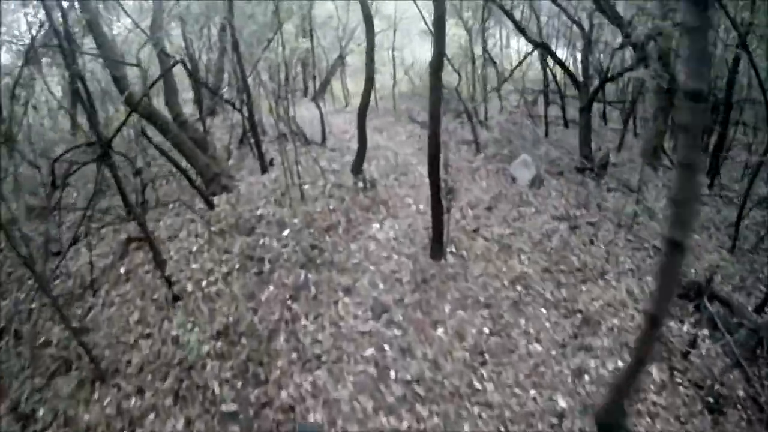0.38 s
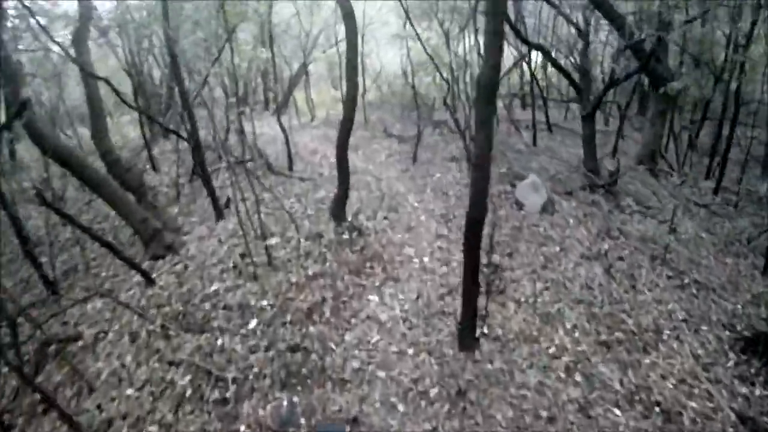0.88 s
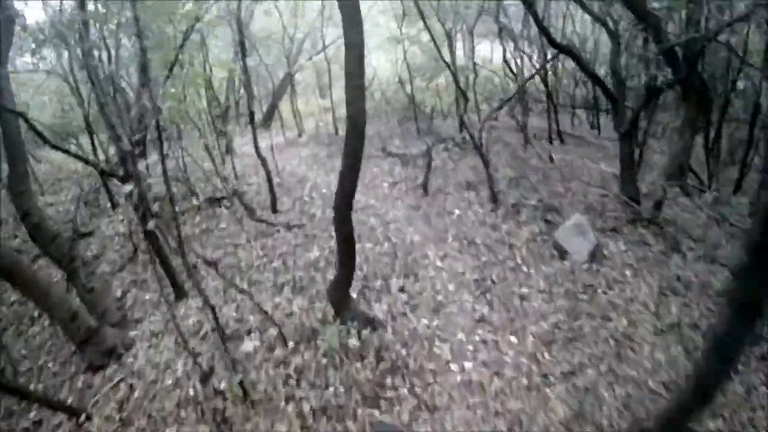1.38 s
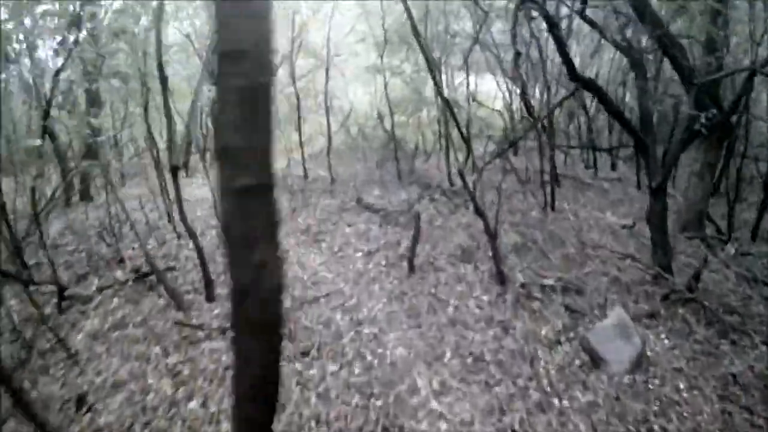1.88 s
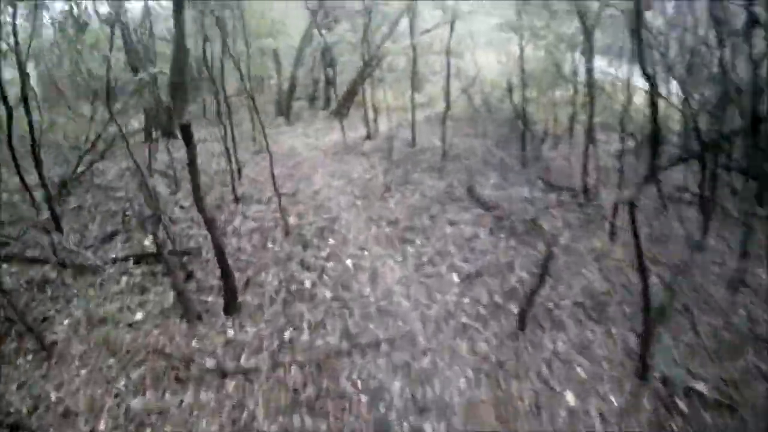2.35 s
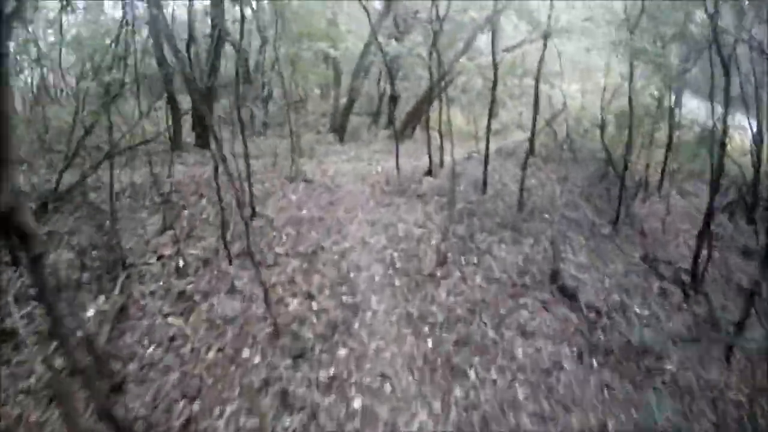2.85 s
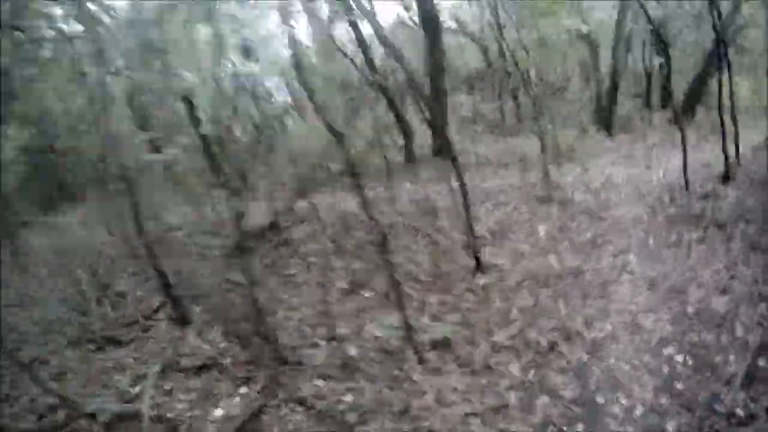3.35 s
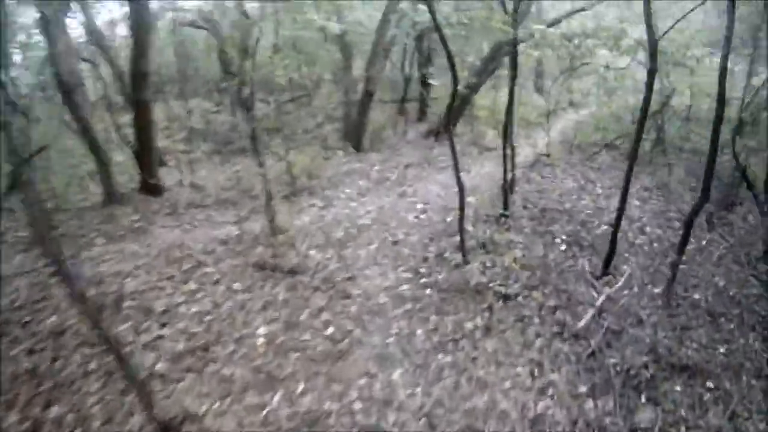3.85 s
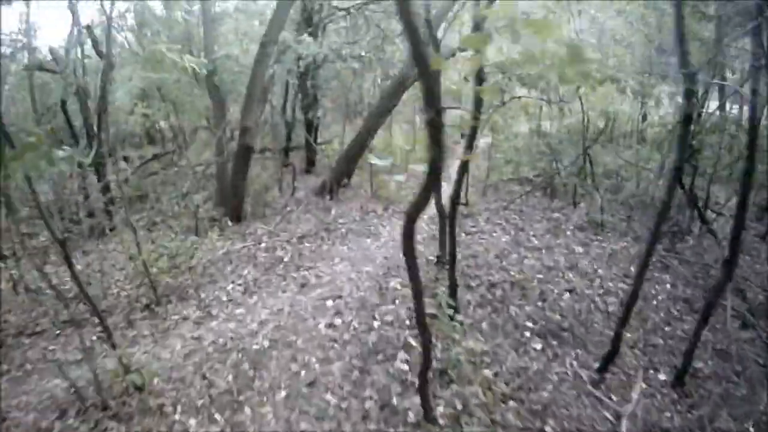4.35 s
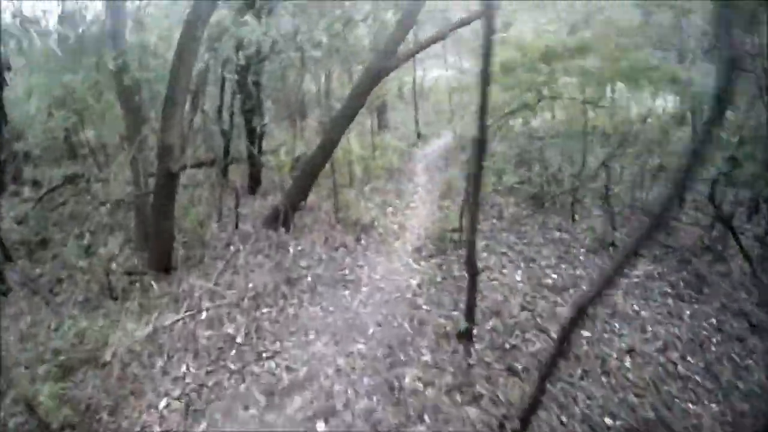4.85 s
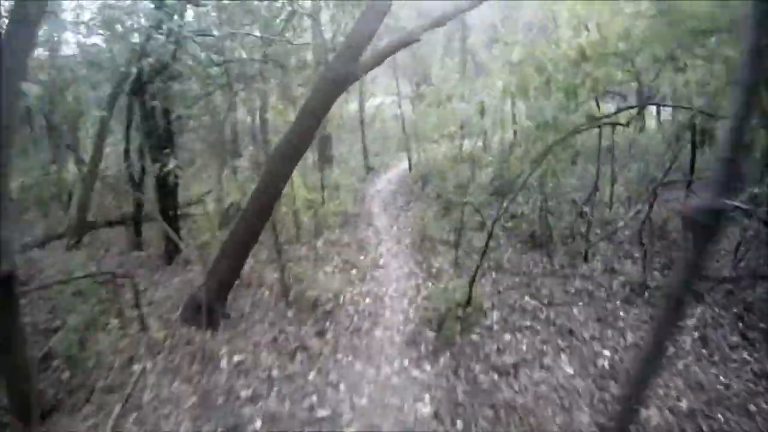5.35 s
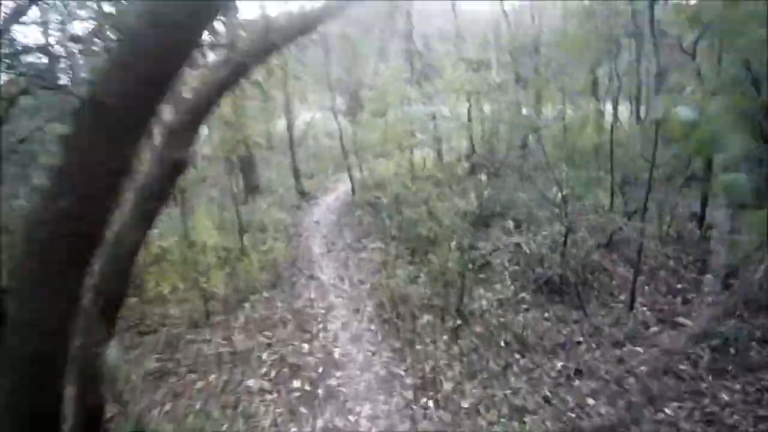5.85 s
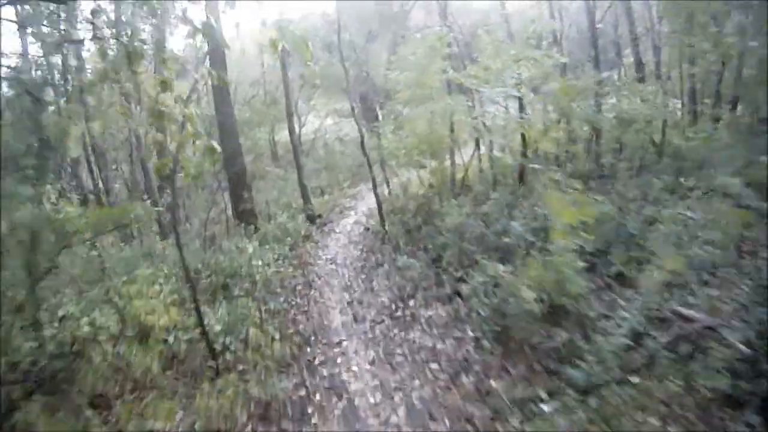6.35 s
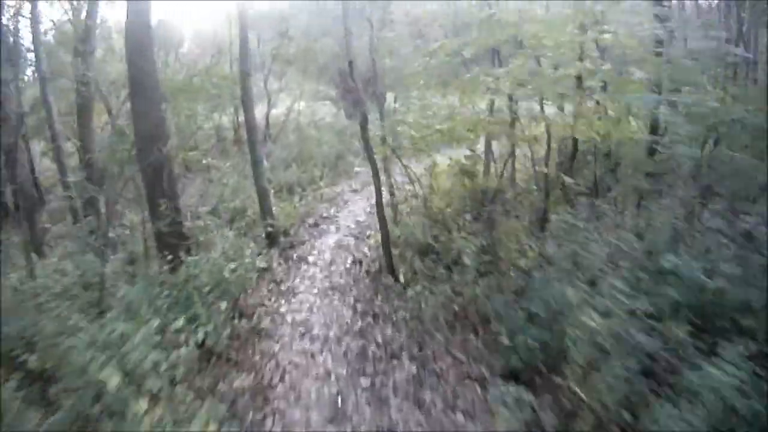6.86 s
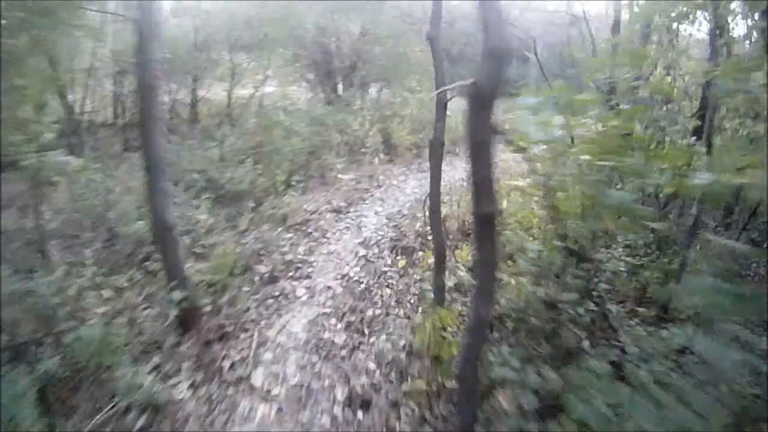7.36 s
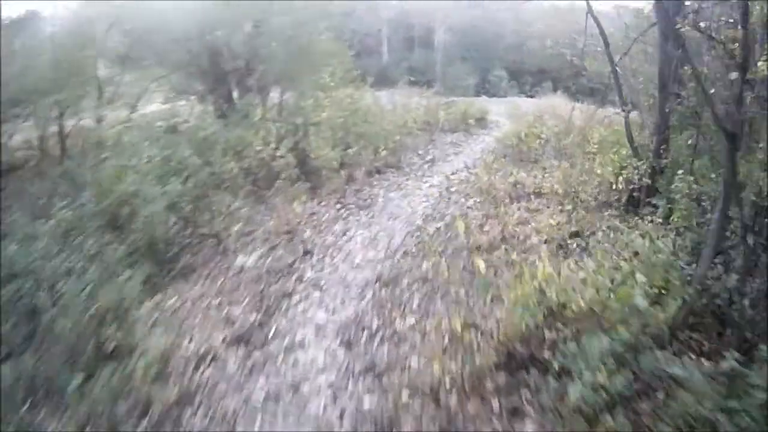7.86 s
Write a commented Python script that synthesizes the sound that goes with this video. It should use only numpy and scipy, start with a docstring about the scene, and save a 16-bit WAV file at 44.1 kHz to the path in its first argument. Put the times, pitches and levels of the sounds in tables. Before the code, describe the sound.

A mountain bike rolls over crackling dry leaves, with low mount thumps, hard plastic knocks, bright rattles and a fast electrical ticking underneath.

```python
"""Jolts, knocks, rattles and squeaks over hissing, crackling leaves, with a fast electric ticking below.
A small camera in a sealed plastic case rides on a cyclist's helmet along a leafy forest trail.
Bumps swing the mount, knocks and loose parts ring the case, and noise filtered by tyres and case makes the leaves.
The camera's supply ticks with its frame rate; its 12 kHz samples are held, which mirrors the sound upward."""
import sys
import numpy as np
from scipy import signal
from scipy.fft import rfft, irfft
from scipy.io import wavfile
from scipy.ndimage import uniform_filter1d

SR = 44100
rng = np.random.default_rng(int(sys.argv[2]) if len(sys.argv) > 2 else 0)


def amplitude_ratio(level_db):
    """Convert a level in decibels to the matching linear amplitude (field) ratio."""
    exponent = np.asarray(level_db, float) / 20
    return 10 ** exponent


def wav_out(sig):
    """Save sig, one row per channel (or a flat mono array), as 16-bit PCM at SR to the path in sys.argv[1]."""
    wavfile.write(sys.argv[1], SR, np.round(np.clip(np.atleast_2d(sig).T, -1, 1) * 32767).astype(np.int16))


N = 362502
T = np.arange(N) / SR
STOP_S = 7.9722  # the sound stops here, shortly before the end

# air and walls of the case under bright clicks: f/Hz, width/Hz, level/dB
CASE_BRIGHT = [(2655, 250, -1), (3145, 120, 1), (3480, 240, -2.5), (3944, 140, -3), (4150, 610, -9),
               (4865, 173, -2), (5280, 360, -9)]
# leaves under the tyres, as the levels they give: t/s, crackle/dB, tyre hiss/dB
LEAF_LEVELS = [(0, -72, -62.5), (.15, -62.5, -60.5), (.4, -63.5, -60), (.55, -69, -60.5), (.8, -61, -58.5),
               (1.25, -62, -59), (1.62, -59, -56.5), (1.75, -63, -61), (1.98, -68, -62), (2.1, -63, -60),
               (2.35, -62, -60), (2.5, -65.5, -63.5), (2.7, -59.5, -58), (3.0, -60.5, -60.5),
               (3.5, -56.5, -59), (3.58, -70.5, -64), (3.85, -68, -64), (4.0, -60, -57), (4.2, -61, -61.5),
               (4.5, -67, -62.5), (4.7, -63.5, -61.5), (5.15, -61.5, -58.5), (5.5, -62.5, -59.5),
               (5.75, -67, -61.5), (6.05, -64, -63), (6.3, -68.5, -61.5), (6.45, -58.5, -59.5),
               (6.9, -68.5, -59.5), (7.08, -63, -58.5), (7.4, -67.5, -57), (7.8, -62, -58)]


def level(x, db):
    """Scale to an rms level."""
    return x * amplitude_ratio(db) / np.sqrt(np.mean(x ** 2))


def colour(x, points):
    """Shape the spectrum along (f/Hz, level/dB) points."""
    hz, db = np.transpose(points)
    bins = np.fft.rfftfreq(N, 1 / SR) + 1e-3  # avoids the logarithm of zero
    gain_db = np.interp(np.log(bins), np.log(hz), db)
    return irfft(rfft(x) * amplitude_ratio(gain_db), N)


def resonate(x, peaks):
    """Sum of band-pass resonances with alternating sign."""
    total = 0
    for k, (hz, width, db) in enumerate(peaks):
        b, a = signal.iirpeak(hz, hz / width, SR)
        total = total + (-1) ** k * amplitude_ratio(db) * signal.lfilter(b, a, x)
    return total


def bright(x, peaks, low_hz=2550):
    """Bright resonances of the case; such sounds are weakened more and more below low_hz."""
    high_pass = signal.butter(3, low_hz, "high", fs=SR, output="sos")
    return signal.sosfilt(high_pass, resonate(x, peaks))


def walk(rate):
    """Random levels held 1 / rate s and smoothed twice; spread 1."""
    k = int(SR / rate)
    held = np.repeat(rng.standard_normal(N // k + 1), k)
    w = uniform_filter1d(uniform_filter1d(held, k), k)[:N]
    return w / w.std()


def grains(per_s, spread_db):
    """Scattered clicks of either sign, a few larger than the rest."""
    hit = rng.random(N) < per_s / SR
    extra_db = spread_db * np.minimum(rng.exponential(size=N), 3)
    return hit * rng.standard_normal(N) * amplitude_ratio(extra_db)


def gritty(per_s, spread_db, share_db):
    """Smooth noise with a share of separate grains."""
    smooth = level(rng.standard_normal(N), 0)
    return smooth + level(grains(per_s, spread_db), share_db)


def add(out, s, x):
    """Mix x in at time s."""
    i = int(s * SR)
    out[i:i + len(x)] += x[:N - i]


def jolts(rise=0.27, fall=0.57):
    """The mount swings out once and rings down; rise and fall are in swing periods."""
    # jolts of the mount, at the crest of the swing: t/s, peak level/dB, swing f/Hz
    bumps = [(0.115, -36, 26), (0.55, -42, 30), (0.892, -37, 35), (1.7355, -31.5, 31), (2.013, -33, 37.7),
             (2.2575, -32.5, 26.3), (2.328, -34.5, 30), (2.629, -38, 28), (3.0638, -26.5, 35),
             (3.349, -33.5, 31), (3.417, -20.5, 44.6), (3.4805, -17, 45.4), (4.136, -36, 29.5),
             (4.895, -42.5, 25), (5.0295, -36, 40), (5.0864, -35, 36.8), (5.193, -31, 30.3),
             (5.546, -36.5, 38), (6.141, -36, 31.2), (6.399, -30, 34), (6.456, -19.5, 58),
             (6.521, -12.5, 50), (6.7642, -41, 33.6), (6.8866, -35.5, 70), (6.925, -40, 39),
             (7.002, -35.5, 28), (7.087, -24, 39), (7.181, -21.5, 55.3), (7.225, -25.5, 38),
             (7.4018, -29.5, 33), (7.4447, -27.5, 28.6), (7.6606, -33.5, 28.8), (7.733, -36.5, 65),
             (7.7644, -32, 60), (7.8705, -36, 37.4), (7.9465, -33.5, 36)]
    out = np.zeros(N)
    t = np.arange(-.06 * SR, .16 * SR) / SR
    for s, db, hz in bumps:
        swing = t * hz
        # rounded at the crest, a quick swell before it and a straight decay (in dB) after
        shape = np.where(t < 0, np.exp(-(swing / rise) ** 2), 1 / np.cosh(swing / fall))
        add(out, s + t[0], amplitude_ratio(db) * shape * np.cos(2 * np.pi * swing))
    return out


def knocks(knee_hz=680, thud_db=-14, thud_per_tilt=1.7, thud_s=0.0033):
    """A push, then scraping, rings the walls; spots favour low or high modes, dull knocks shove the whole case."""
    # walls of the case when knocked: f/Hz, level/dB, time to fall by 60 dB/s
    case_modes = [(494, -18.5, 0.0081), (627, -5.5, 0.021), (713, -3.5, 0.023), (990, -7.5, 0.015),
                  (1250, 3, 0.0054), (1694, 6, 0.0063), (2090, -1, 0.016), (2633, -17, 0.045)]
    # knocks on the case: t/s, peak level of the blow/dB, brightness/(dB per octave),
    # scraping level against the blow/dB, scraping time (strongest halfway)/s
    hits = [(3.032, -38, -12.5, -1.5, 0.0027), (3.036, -36.5, -7.5, 3, 0.0062),
            (3.042, -38.5, -3.5, 6.5, .0055), (3.303, -45.5, 5, 2.5, 0.016), (3.318, -46, 1, 4, .01),
            (3.372, -44, -2, 1, .008), (3.392, -46, 17, 6, 0.013), (3.407, -41, -4, 6.5, .006),
            (3.425, -49, 4, 4.5, .008), (3.439, -39, -8, 3.5, 0.0046), (3.449, -45, -1.5, 9, 0.0084),
            (4.914, -49.5, 10, 10, 0.027), (5.864, -50.5, 28.5, 6.5, 0.0061),
            (6.4442, -5.5, 1, -14.5, .006), (6.4789, -22.5, -6, -5, 0.013), (6.497, -40, 1, 3, 0.0071),
            (6.51, -39, -5, 4, 0.0098), (6.8, -37, 32, -2, .006), (7.056, -40, -7, 5.5, 0.0044),
            (7.1674, -30, -6, -2.5, .006), (7.205, -42, -11, -12, 0.0037), (7.341, -44.5, -5, -2.5, .006),
            (7.3727, -32.5, -8.5, 0.5, 0.0081), (7.581, -45.5, 2, 5, 0.0091)]
    # a harder, brighter knock touches more briefly: time at even brightness, dB per octave that halve it
    even_contact_ms, halving_db = 0.38, 13.5
    out = np.zeros(N)
    t = np.arange(int(.1 * SR)) / SR
    grits = rng.standard_normal((len(hits), len(t)))
    for (s, db, tilt_db, scrape_db, scrape_s), grit in zip(hits, grits):
        ring = np.zeros(len(t))
        for hz, mode_db, t60 in case_modes:
            mode_amp = amplitude_ratio(mode_db + tilt_db * np.log2(max(hz, knee_hz) / 1000))
            ring += mode_amp * np.exp(-np.log(1000) * t / t60) * np.sin(2 * np.pi * hz * t)
        contact_ms = even_contact_ms * 2 ** (-tilt_db / halving_db)
        # the wall is pushed in and springs back, each for the contact time
        push = np.sin(2 * np.pi * np.clip(500 * t / contact_ms, 0, 1))
        blow = signal.fftconvolve(push, ring)[:len(t)]
        thud = amplitude_ratio(thud_db - thud_per_tilt * tilt_db) * t / thud_s * np.exp(1 - t / thud_s)
        # the scraping swells and dies
        age = 2 * t / max(scrape_s, .001)
        scrape = signal.fftconvolve(grit * age * np.exp(-age ** 2 / 2), ring)[:len(t)]
        ringing = blow / np.abs(blow).max() + amplitude_ratio(scrape_db) * scrape / np.abs(scrape).max()
        add(out, s, amplitude_ratio(db) * (ringing - thud))
    return out


def rattles(bounce_s=0.0052, click_s=0.0017, rise_s=0.0011, soft_hz=4200, tail_db=-20, tail_s=0.018):
    """A few bounces, each a puff of grit that rings the bright resonances; debris trails after."""
    # rattles, each a short train of bright clicks: t/s, rms level over 80 ms/dB, length/s
    trains = [(0.178, -69, 0.0084), (1.092, -64.5, 0.012), (2.18, -71, .004), (4.958, -60.5, 0.0032),
              (4.966, -58, 0.0041), (5.029, -55.5, 0.0068), (5.121, -53.5, 0.022), (5.16, -60, 0.0054),
              (5.166, -53, 0.0079), (5.219, -52, 0.0049), (5.233, -64, 0.011), (5.257, -59, 0.0052),
              (5.404, -54.5, 0.0059), (5.447, -60.5, 0.0038), (5.507, -61.5, 0.013), (5.577, -60, 0.0068),
              (5.634, -64.5, 0.015), (6.183, -64.5, 0.018), (6.471, -54.5, 0.0036), (6.71, -64, 0.0058),
              (6.797, -54, 0.0042), (7.3814, -50.5, 0.011), (7.425, -58, 0.0036), (7.432, -58, 0.0066),
              (7.461, -57, 0.0086), (7.65, -56.5, 0.019), (7.675, -53, 0.019), (7.718, -59, 0.012),
              (7.764, -56, 0.0096), (7.886, -63.5, 0.007)]
    out = np.zeros(N)
    t = np.arange(int(.08 * SR)) / SR
    soft = signal.butter(2, soft_hz, fs=SR, output="sos")
    grits = rng.standard_normal((len(trains), len(t)))
    sways = rng.standard_normal((len(trains), 16))
    for (s, db, length), grit, sway in zip(trains, grits, sways):
        # uneven gaps between the bounces
        starts = np.cumsum(np.r_[0, bounce_s * np.exp(.3 * sway)])
        since = np.clip(t - starts[:, None], 0, None)
        puffs = np.exp(-since / click_s) * (1 - np.exp(-since / rise_s))
        # bounces keep their strength, then stop rather suddenly
        fading = np.exp(-(starts / max(length, .001)) ** 4)
        force = fading @ puffs + amplitude_ratio(tail_db) * np.exp(-t / tail_s)
        clicks = bright(signal.sosfilt(soft, grit * force), CASE_BRIGHT)
        add(out, s, level(clicks, db))
    return out


def squeaks(waver=0.014):
    """A dry joint gives brief, slightly falling tones."""
    # short squeaks from a dry joint: t of the middle/s, peak level/dB, pitch f/Hz, length/s
    tones = [(4.372, -47.5, 3540, 0.0047), (4.919, -60, 3550, 0.0065), (5.072, -53, 3530, 0.0057),
             (5.093, -52, 3530, 0.007)]
    out = np.zeros(N)
    for s, db, hz, length in tones:
        age = (T - s) / length
        cycles = hz * (T - s) * (1 - waver * np.clip(age, -3, 3))
        out += amplitude_ratio(db) * np.exp(-2 * age ** 2) * np.sin(2 * np.pi * cycles)
    return out


def leaf_crackle(slow_db=1.3):
    """Crackle arrives from changing directions, so each bright resonance of the case swells alone."""
    s, crackle_db, _ = np.transpose(LEAF_LEVELS)
    grit = gritty(600, 2.0, -5.0)
    crackle = np.zeros(N)
    for k, peak in enumerate(CASE_BRIGHT):
        crackle += (-1) ** k * bright(grit, [peak]) * amplitude_ratio(slow_db * walk(3.01))
    return level(crackle, 0) * amplitude_ratio(np.interp(T, s, crackle_db) + 1.9 * walk(15))


def tyre_hiss():
    """Tyres on leaves: gritty noise in a middle band, rising and falling with the leaves."""
    # colour of the hiss: f/Hz, relative level per Hz/dB
    hiss_colour = [(600, -31), (1100, -15), (1400, -6.5), (1700, -4.5), (1900, -7.5), (2290, 0.5),
                   (2500, -5), (2680, -2), (2900, -28.5), (3800, -49)]
    s, _, hiss_db = np.transpose(LEAF_LEVELS)
    hiss = level(colour(gritty(900, 2.2, -5), hiss_colour), 0)
    return hiss * amplitude_ratio(np.interp(T, s, hiss_db) + 1.3 * walk(24))


def ground_shake_db():
    """How strongly the ground shakes the mount, in dB, before the random swells."""
    # roughness of the ground, as the shaking of the mount: t/s, level/dB
    ground = [(0.0, -49.5), (0.28, -54.5), (0.67, -51), (1.02, -53.5), (1.97, -49), (2.17, -44.5),
              (2.74, -47), (3.45, -42.5), (3.67, -51.5), (4.36, -53), (5.26, -41.5), (5.82, -48.5),
              (6.86, -39), (7.1, -36.5), (7.32, -39), (7.8, -43)]
    return np.interp(T, *np.transpose(ground))


def shake(shake_db):
    """Rough ground shakes the mount: deep noise with random swells."""
    # colour of the shaking: f/Hz, relative level per Hz/dB
    shake_colour = [(4.7, -43.5), (8.0, 2.5), (28, -3), (47, -6), (81, -22), (123, -34), (200, -40),
                    (260, -74.5), (440, -120)]
    rumble = level(colour(rng.standard_normal(N), shake_colour), 0)
    return rumble * amplitude_ratio(shake_db + 3.5 * walk(9))


def patter(shake_db, calm_db=-55, calm_patter_db=-62, gain_per_db=0.266):
    """Low, grainy noise that grows with the shaking; calm_db is the shaking on calm ground."""
    # colour of the patter: f/Hz, relative level per Hz/dB
    patter_colour = [(60, -34.5), (100, 2.5), (184, -3), (424, -8.5), (706, -7), (950, -8.5), (1150, -16),
                     (1700, -24.5), (3000, -61.5)]
    patter_db = calm_patter_db + gain_per_db * (shake_db - calm_db)
    drumming = level(colour(gritty(120, 3.3, -1.7), patter_colour), 0)
    return drumming * amplitude_ratio(patter_db + 1.6 * walk(30))


def supply(step_db=-51, second_db=-54, scatter_db=4.5, slip_s=.0015, rise_s=0.00059, fall_s=0.0028,
           dip_db=-61, dip_width=0.078, fizz_db=-12, fizz_s=0.0055, fizz_hz=1000):
    """The supply leaks into the microphone: each third frame two steps fizz and sag; each frame it dips."""
    # the strongest steps of the supply: t/s, peak level/dB
    strong_steps = [(0.023, -41), (0.1224, -45.5), (0.2813, -41.5), (0.424, -43), (.931, -42), (1.824, -41),
                    (1.977, -37.5), (2.282, -46.5), (2.526, -42.5), (2.7767, -43.5), (3.0742, -37),
                    (3.2747, -43.5), (3.5255, -42), (4.291, -38), (4.4274, -41), (4.8864, -42),
                    (5.0277, -40), (5.29, -39), (5.5296, -40.5), (5.6794, -43), (5.8783, -42),
                    (6.0792, -37.5), (6.182, -40), (7.029, -37.5), (7.1304, -42.5), (7.2817, -40),
                    (7.483, -35), (7.5323, -42), (7.584, -39.5), (7.6386, -38), (7.7297, -37.5),
                    (7.8815, -42.5)]
    frame_hz = 60000 / 1001
    busy_s, second_s, dip_s = .0237, .0083, .0122  # first step, delay of the second step, first dip
    kicks = np.zeros(N)
    regular = np.arange(busy_s, STOP_S, 3 / frame_hz)
    for late_s, db in ((0, step_db), (second_s, second_db)):
        size, slip = np.clip(rng.standard_normal((len(regular), 2)), -2, 2).T
        places = ((regular + late_s + slip_s * slip) * SR).astype(int)
        kicks[places] += amplitude_ratio(db + scatter_db * size)
    s, db = np.transpose(strong_steps)
    kicks[(s * SR).astype(int)] += amplitude_ratio(db)
    t = np.arange(int(.03 * SR)) / SR
    step = np.exp(-t / fall_s) * (1 - np.exp(-t / rise_s))
    steps = signal.fftconvolve(kicks, step / step.max())[:N]
    low_pass = signal.butter(2, fizz_hz, fs=SR, output="sos")
    dull = signal.sosfilt(low_pass, rng.standard_normal(N))
    fizz = level(dull, fizz_db) * signal.fftconvolve(kicks, np.exp(-t / fizz_s))[:N]
    # distance from the nearest dip and its width, both in frames
    from_dip = ((T - dip_s) * frame_hz + .5) % 1 - .5
    dips = amplitude_ratio(dip_db) * np.exp(-np.abs(from_dip) / dip_width)
    return steps + fizz - dips


def own_noise():
    """The microphone's steady hiss."""
    return level(rng.standard_normal(N), -63.5)


def scene():
    """All layers reach the one microphone; rough ground raises the shaking and the patter."""
    shake_db = ground_shake_db()
    impacts = jolts() + knocks() + rattles() + squeaks()
    riding = leaf_crackle() + tyre_hiss() + shake(shake_db) + patter(shake_db)
    mix = impacts + riding + supply() + own_noise()
    return mix[None]  # one channel


def roll_off(x):
    """The treble ends steeply here."""
    return signal.sosfilt(signal.butter(12, 16600, fs=SR, output="sos"), x)


def record(dry, edge_hz=5500, top_hz=15300):
    """Sampled at 12 kHz, each sample held four times at 48 kHz, brought to 44.1 kHz; the sound stops short."""
    rounded = signal.sosfilt(signal.butter(4, edge_hz, fs=SR, output="sos"), dry)
    slow = signal.resample_poly(rounded, 40, 147, axis=1)
    # holding mirrors the sound upward
    held = signal.resample_poly(np.repeat(slow, 4, axis=1), 147, 160, axis=1)[:, :N]
    # what is left after the stop is a faint hiss that dies within a tenth of a second
    after = np.clip(T - STOP_S, 0, None)
    hiss_colour = [(100, -3), (700, -12), (2300, -8), (5000, -15), (15000, -22)]  # f/Hz, relative level/dB
    faint = level(colour(rng.standard_normal(N), hiss_colour), -78)
    fading = np.exp(-after / 0.035) * faint
    stopped = np.where(T < STOP_S, held - held.mean(), fading)
    top_edge = signal.ellip(10, .2, 60, top_hz, fs=SR, output="sos")
    finished = signal.sosfilt(top_edge, stopped)
    return roll_off(finished)


dry = scene()
out = record(dry)
wav_out(out)
```